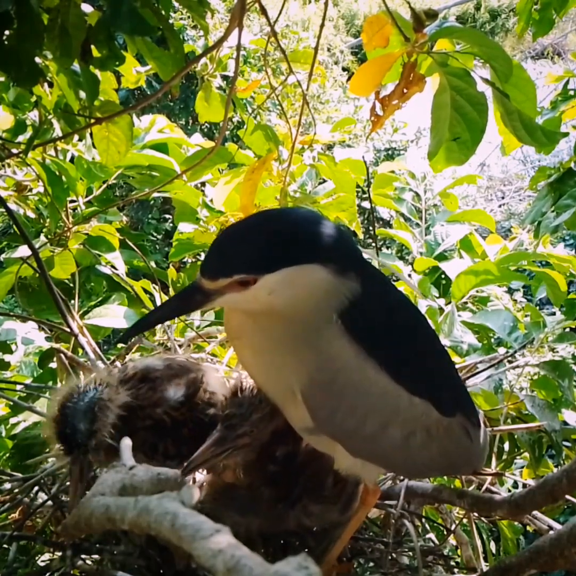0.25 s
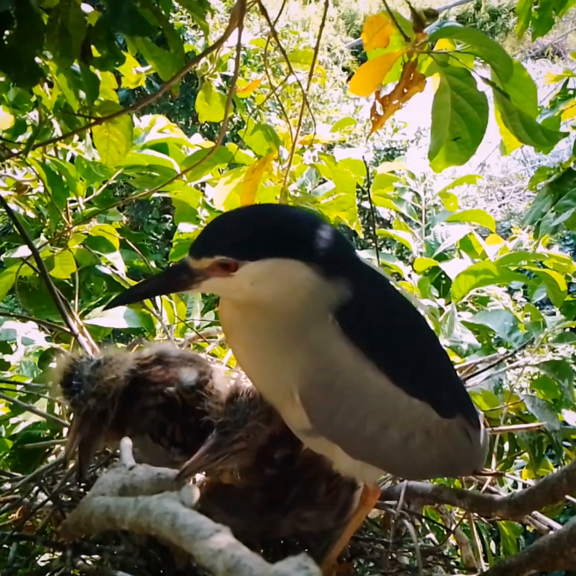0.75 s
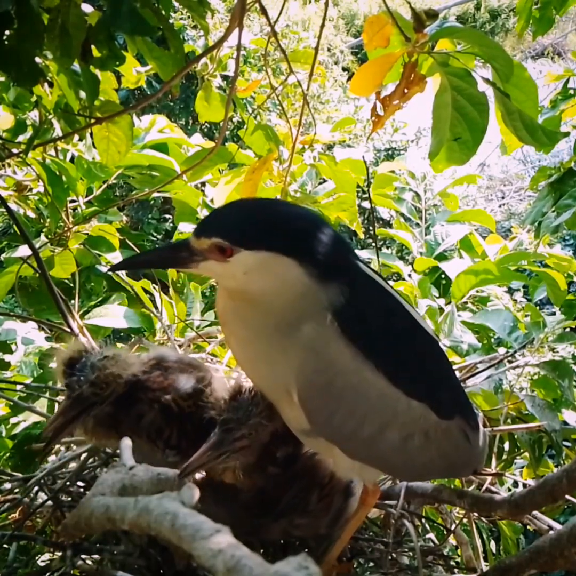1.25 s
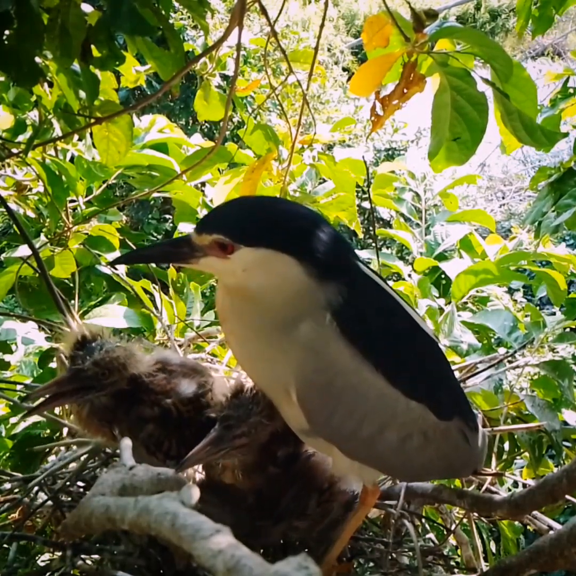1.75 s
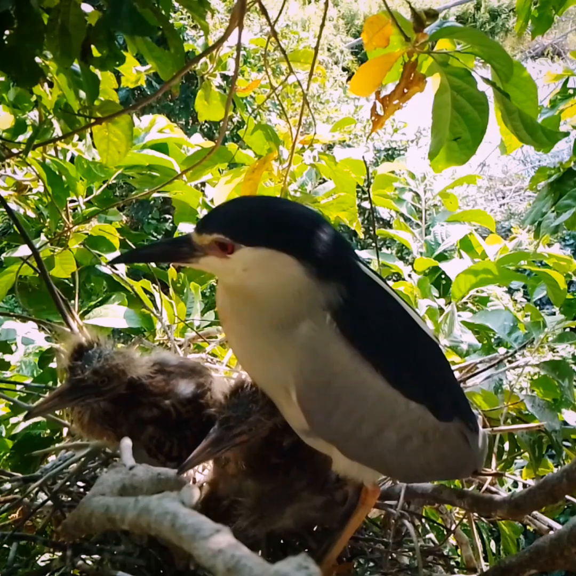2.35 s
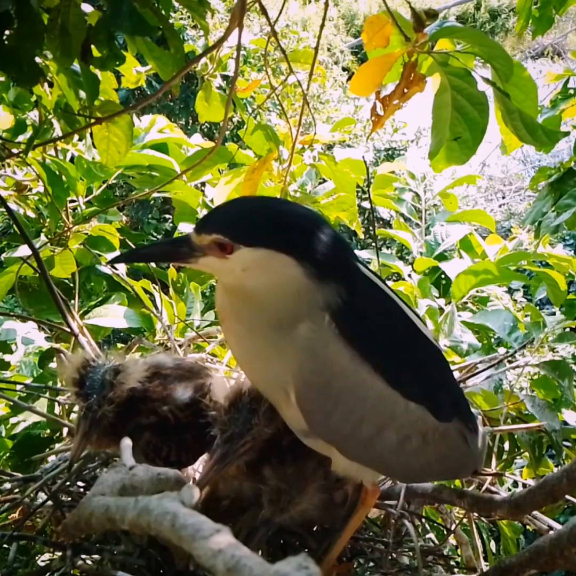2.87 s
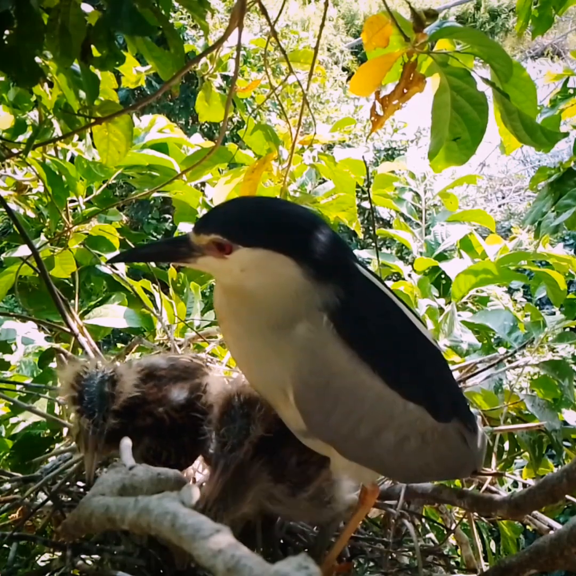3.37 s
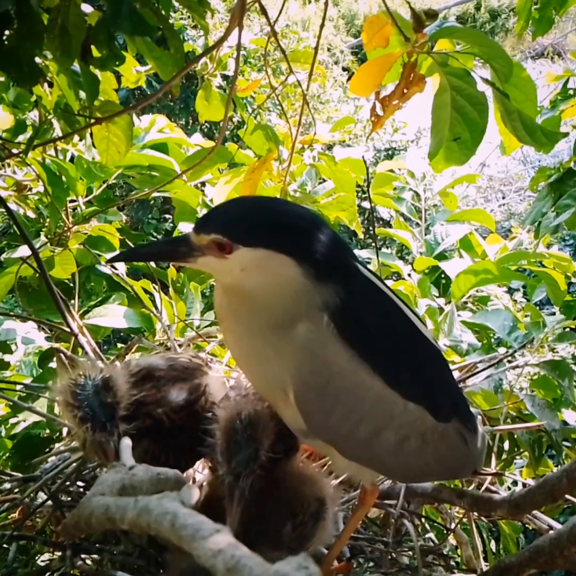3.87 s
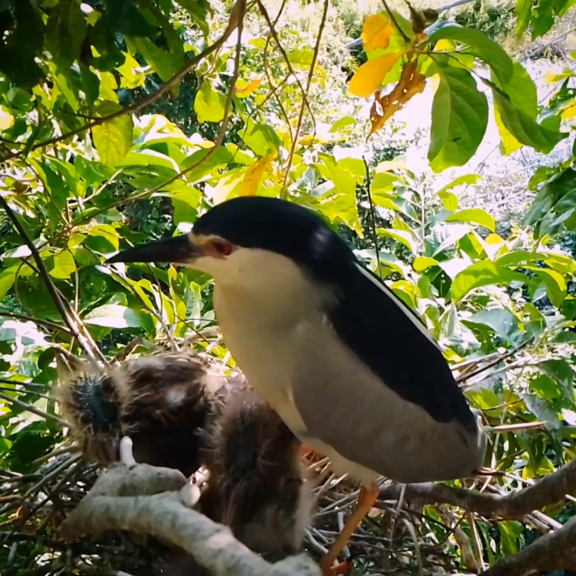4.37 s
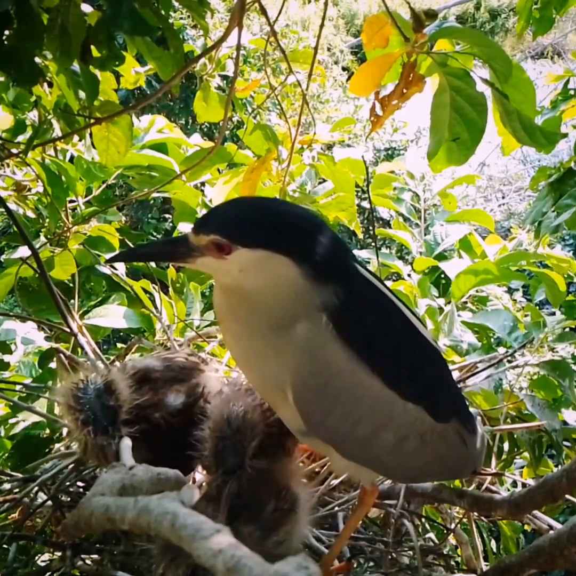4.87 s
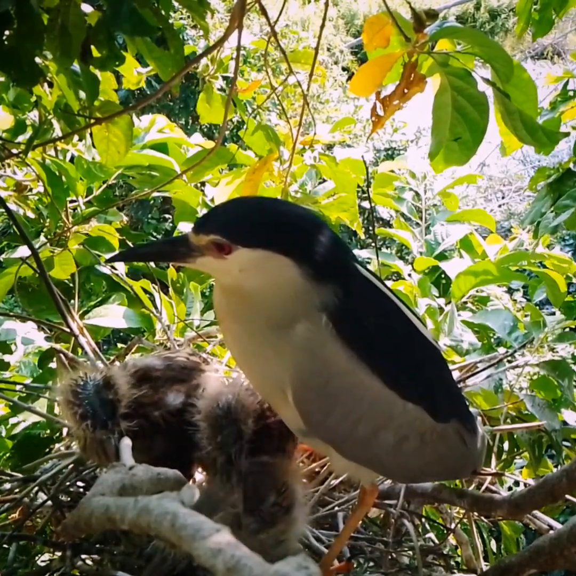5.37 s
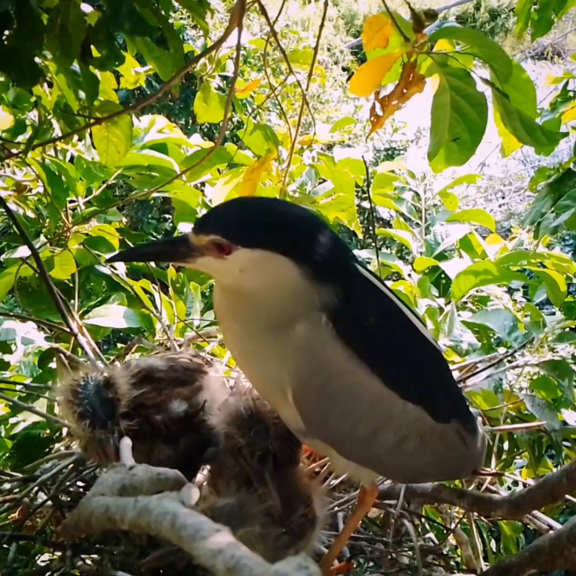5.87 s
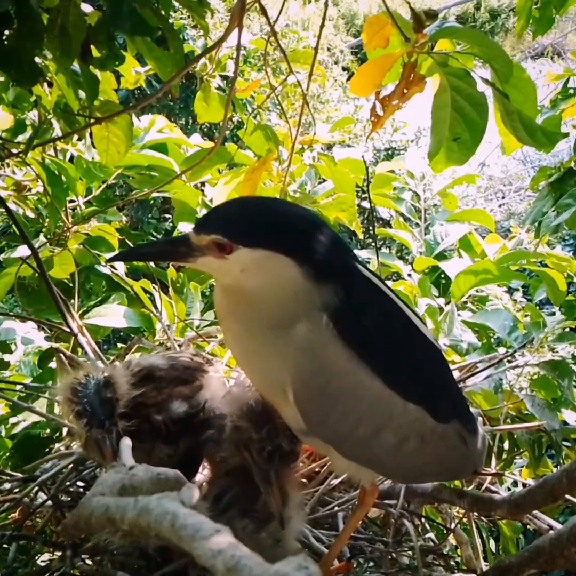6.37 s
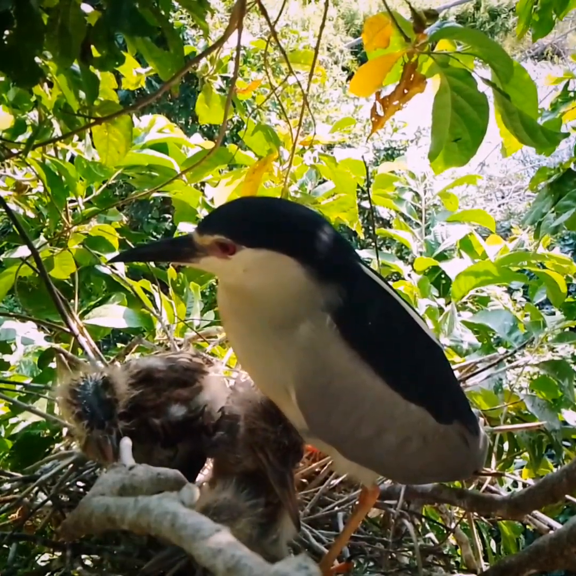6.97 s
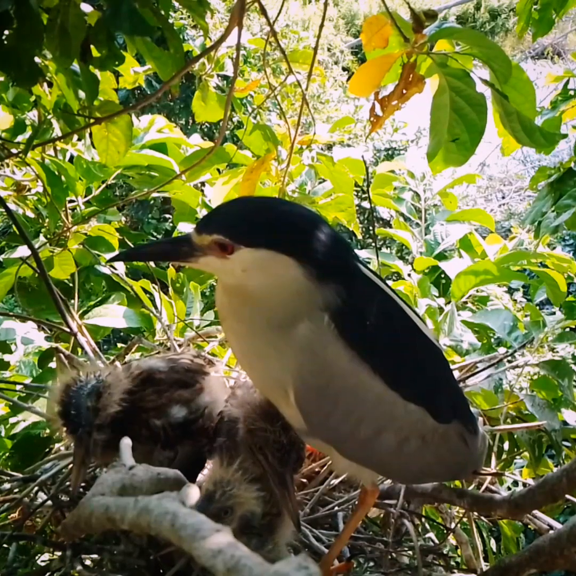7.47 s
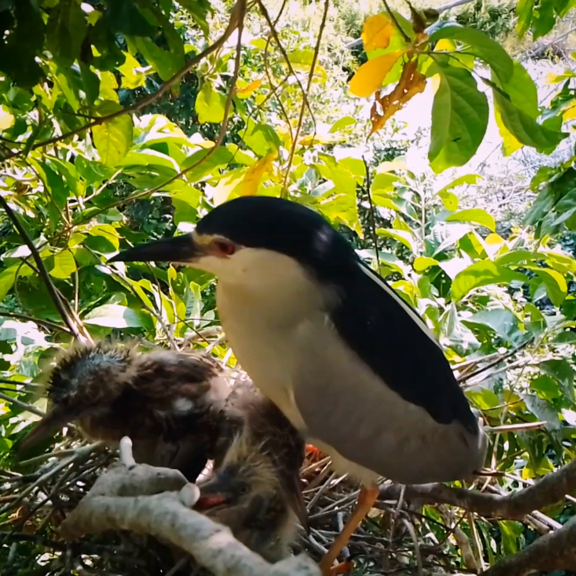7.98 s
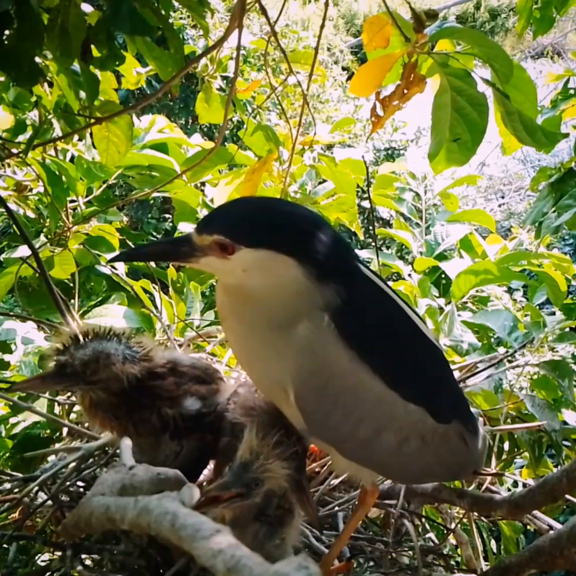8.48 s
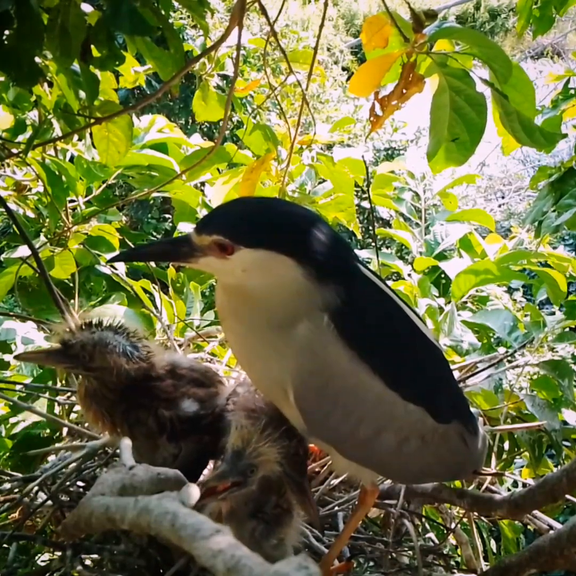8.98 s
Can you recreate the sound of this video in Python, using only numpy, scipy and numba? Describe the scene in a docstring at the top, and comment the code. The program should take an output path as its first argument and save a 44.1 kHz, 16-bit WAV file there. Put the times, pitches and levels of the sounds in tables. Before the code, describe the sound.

Heron chicks beg in a tree nest beside a silent adult. Faint, dry chak notes come several times a second, growing louder; a few thin peeps and a nasal squawk slip in around three seconds. From about five seconds hoarse, hissing rasps crowd between the chaks, strong and urgent to the end. Close stereo microphone, nest slightly to the left, soft leafy air behind.

```python
"""Heron nestlings beg in a nest: short hard "chak" notes (harmonics mixed with breath noise) and hoarse rasps
(throat pulses and noise in a moving mouth resonance, with puffed hiss), plus whistled peeps and harmonic squawks.
A fading noise tail trails the chaks and the hiss, and only faintly the other calls.
A noise tick is a twig; resonant-noise coos and a murmur lie behind.
Two spaced microphone ports, each with its own colour, hear the nest from the left."""
import sys
import numpy as np
from scipy import signal
from scipy.fft import rfft, irfft
from scipy.io import wavfile
from numba import njit

SR = 44100
rng = np.random.default_rng(int(sys.argv[2]) if len(sys.argv) > 2 else 0)


def put_to_file(sound):
    """Save the sound as 16-bit audio at rate SR, in the file named by the first command-line argument."""
    columns = np.atleast_2d(sound).T  # one column per channel
    safe = np.clip(columns, -1, 1)
    whole_steps = np.round(safe * 32767)
    wavfile.write(sys.argv[1], SR, whole_steps.astype(np.int16))


N = 407043
HZ = np.maximum(np.fft.rfftfreq(N, 1 / SR), 1)
RESTING_MOUTH_HZ = 1230


def from_db(db):
    """Decibels to gain."""
    return 10 ** (np.asarray(db) / 20)


def rms_one(x):
    """Scale to rms 1."""
    return x / np.sqrt(np.mean(x ** 2) + 1e-20)


def at_hz(points, hz):
    """Read a spectrum in dB on a log-frequency axis."""
    points_hz, points_db = np.transpose(points)
    return np.interp(np.log(hz), np.log(points_hz), points_db)


def coloured(x, points):
    """Filter a whole-length signal by a spectrum in dB."""
    return irfft(rfft(x) * from_db(at_hz(points, HZ)), N)


def butter(x, order, cutoff_hz, kind):
    """Butterworth filter, "low" or "high" pass."""
    return signal.sosfilt(signal.butter(order, cutoff_hz, kind, fs=SR, output="sos"), x)


def wobble(size, rate_hz):
    """Slow random wander of rms 1: noise through a double one-pole low-pass."""
    r = np.exp(-2 * np.pi * rate_hz / SR)
    noise = rng.standard_normal(size + 2000)
    return rms_one(signal.lfilter([1], [1, -2 * r, r * r], noise)[2000:])


def phase_of(hz):
    """Phase in radians of a moving frequency."""
    return 2 * np.pi * np.cumsum(hz) / SR


def note(start_s, length_s, *pitches_hz):
    """Sample span, place 0-1 and parabolic pitch of one call."""
    along = np.linspace(0, 1, round(length_s * SR))
    at = round(start_s * SR) + np.arange(len(along))
    return at, along, np.polyval(np.polyfit([0, .5, 1], pitches_hz, deg=2), along)


@njit
def moving_resonance(x, hz, width_hz, sr):
    """Two-pole resonance whose centre and width move."""
    out = np.zeros(len(x))
    for i in range(2, len(x)):
        r = np.exp(-np.pi * width_hz[i] / sr)
        drive = (1 - r * r) / 2 * (x[i] - x[i - 2])
        out[i] = drive + 2 * r * np.cos(2 * np.pi * hz[i] / sr) * out[i - 1] - r * r * out[i - 2]
    return out


def breath_pair(points, source=0):
    """Partly alike breath noise for two ports, with narrow bands drifting randomly in pitch and level; rms 1."""
    # narrow noise bands: mean_centre_hz
    band_hz = [2745, 4083, 4940, 5440, 6310, 7570, 10950]
    alike = 0.068  # power share of the noise common to both ports
    shared, *own = rng.standard_normal((3, N))
    air = coloured(np.sqrt(alike) * (shared + source) + np.sqrt(1 - alike) * np.array(own), points)
    out, width_hz = air.copy(), np.full(N, 345.)
    for hz in band_hz:
        centre_hz = hz * (1 + 0.035 * wobble(N, rate_hz=4))
        gain = from_db(3.5 + 3.0 * wobble(N, rate_hz=8))
        out += gain * np.array([moving_resonance(side, centre_hz, width_hz, SR) for side in air])
    return rms_one(out)


def chaks():
    """Harmonics on a pitch that lifts slightly, then slides down, mixed with breath; voice pair and one breath."""
    # notes, levels before trim: start_s, level_db, start_pitch_hz, fade_at_s, throat_hz, treble_lift_db
    chak_notes = [(0.489, -55.5, 666, 0.018, 3400, -8), (0.53, -49, 770, 0.06, 5400, -3.5),
                  (0.736, -47, 793, 0.047, 3830, -9), (0.952, -52.5, 682, 0.013, 2600, -25),
                  (1.037, -41.5, 760, 0.027, 3820, 3.5), (1.1775, -49.5, 820, 0.018, 3950, -26),
                  (1.319, -37.5, 976, 0.028, 3880, -1.5), (1.385, -48, 770, 0.032, 3840, 0),
                  (1.603, -34, 829, 0.031, 3870, 3), (1.713, -48, 730, 0.057, 2540, -6),
                  (1.835, -46, 612, 0.012, 3800, -29), (2.199, -38, 660, 0.018, 2620, -1),
                  (2.278, -53.5, 720, 0.04, 2820, -36), (2.477, -46.5, 950, 0.012, 4100, -11),
                  (2.58, -33.5, 920, 0.032, 2600, -1.5), (2.774, -47.5, 840, 0.012, 4170, -25),
                  (2.892, -33, 1268, 0.028, 2470, -5), (3.397, -45, 956, 0.028, 3280, 10),
                  (3.614, -27, 925, 0.013, 3800, 2), (3.731, -44.5, 930, 0.016, 3700, 7),
                  (3.9595, -33, 1086, 0.02, 2420, -3.5), (4.267, -40, 696, 0.049, 3450, 6.5),
                  (4.496, -36.5, 760, 0.036, 3050, 2), (4.707, -32.5, 843, 0.029, 4000, 2.5),
                  (5.01, -33.5, 714, 0.033, 2920, 3.5), (5.2336, -25.5, 783, 0.026, 3180, -2),
                  (5.368, -40.5, 910, 0.023, 3341, 6.5), (5.432, -27, 820, 0.039, 3700, 0),
                  (6.143, -25.5, 631, 0.016, 3300, 5.5), (6.377, -23, 712, 0.026, 4300, 4.5),
                  (6.599, -23.5, 812, 0.032, 2720, 0.5), (6.823, -26.5, 820, 0.031, 3460, -0.5),
                  (7.049, -25.5, 812, 0.027, 2760, -1), (7.276, -28.5, 796, 0.036, 2730, -7.5),
                  (7.845, -30, 811, 0.029, 3070, 3), (8.083, -30.5, 711, 0.038, 3380, 2),
                  (8.313, -28, 760, 0.035, 3060, -3.5), (8.441, -50.5, 786, 0.036, 5400, 10),
                  (8.525, -26, 809, 0.031, 2900, 5), (8.678, -48, 783, 0.04, 3900, -15),
                  (8.749, -27.5, 803, 0.032, 3040, 4.5), (8.954, -27, 765, 0.028, 3000, -4.5),
                  (9.158, -53, 756, 0.17, 3070, -12)]
    # throat spectrum: frequency_hz, level_db
    throat = [(600, -27), (1800, -28), (2400, -14.5), (3000, -0.5), (4000, -2), (5500, -5), (7500, -9),
              (11000, -8.5), (13500, -26)]
    # notes clear up as the begging gets eager: time_s, roughness (0-1)
    roughness = [(0, .55), (4.2, .42), (5.0, .36), (9.2, .31)]
    attack_s, trim_db, pitch_bend = 0.019, -4, .048
    ring_db, ring_width_hz = 5.5, 350
    size = 4410
    voice, air = np.zeros((2, N)), np.zeros((2, N))
    breath = breath_pair(throat)
    bright = rms_one(butter(breath, 2, 5000, "high"))
    t, k = np.arange(size) / SR, np.arange(1, 19)[:, None]
    for start_s, level_db, pitch_hz, fade_at_s, throat_hz, lift_db in chak_notes:
        at = np.minimum(round(start_s * SR) + np.arange(size), N - 1)
        along = np.minimum(t / fade_at_s, 1)
        # the membranes lose their regular beat along the note
        broken = np.clip(np.interp(start_s, *np.transpose(roughness)) + .45 * (along - .3), .03, 1)
        bend = pitch_bend * rng.uniform(.6, 1.3) * (.9 * along - 2 * along ** 2.5)
        hz = pitch_hz * (1 + bend + 0.027 * broken * wobble(size, rate_hz=200))
        phase = phase_of(hz)

        treble_db = lift_db * np.clip((k * hz - 3500) / 3000, 0, 1) + 2.8 * (k * hz > 3600)
        throat_ring_db = ring_db / (1 + ((k * hz - throat_hz) / ring_width_hz) ** 2)
        uneven_db = rng.normal(0, 2.2, k.shape)
        partials_db = at_hz(throat, k * hz) + treble_db + throat_ring_db + uneven_db
        partials = from_db(partials_db) * np.cos(k * phase + rng.uniform(0, 2 * np.pi, k.shape))
        # each port draws its own random balance of harmonics for every note
        tone = rms_one(from_db(rng.normal(0, 3, (2, len(k)))) @ partials)

        noise = breath[:, at] + from_db(lift_db - 5.0) * bright[:, at]
        puffs = rms_one(noise * (1 + 0.42 * np.cos(phase)))

        flutter_db = 1.6 * wobble(size, rate_hz=120)
        fade_db = -3 * along ** 2 - 930 * np.maximum(t - fade_at_s, 0)
        attack = np.sin(np.pi / 2 * np.minimum(t / attack_s, 1)) ** 1.52
        shape = from_db(level_db + trim_db) * attack * from_db(flutter_db + fade_db)
        voice[:, at] += shape * (np.sqrt(1 - broken ** 2) * tone + broken * puffs)
        air[:, at] += shape * (puffs + .5 * tone)
    return voice, air[0]


def rasp_effort():
    """Croak dB, mouth Hz and hiss dB in time; croak power weights the mouth, so the loudest rasp dominates."""
    # rasps, levels before trim: start_s, swell_s, swell_db, fade_s, croak_db, hiss_db,
    # mouth_start_hz, mouth_peak_hz, mouth_end_hz
    rasp_calls = [(-.03, 0.024, 3.6, 0.091, -97, -48.5, 1120, 1070, 1080),
                  (.01, 0.1, 10, 0.036, -67, -57.5, 1150, 1110, 1050),
                  (.275, 0.022, 4, 0.072, -75, -65.5, 1300, 1300, 1300),
                  (.98, 0.061, 10, 0.11, -63, -61.5, 1060, 1070, 1020),
                  (1.321, 0.009, 4.8, 0.027, -63, -60, 1860, 2080, 1730),
                  (1.537, 0.12, 15, 0.0485, -48, -50, 1520, 1620, 1710),
                  (2.0, 0.015, 2, 0.069, -67.5, -70, 960, 940, 900),
                  (2.05, 0.013, 2, 0.063, -78, -61, 900, 880, 860),
                  (2.2, 0.1, 4.7, 0.063, -61.5, -67, 960, 986, 900),
                  (2.577, 0.033, 3.8, 0.27, -59.5, -50, 2280, 2360, 2350),
                  (2.801, .12, 24, 0.047, -55.5, -55, 844, 1460, 1010),
                  (2.921, 0.053, 2, 0.19, -64.5, -40, 820, 830, 1000),
                  (3.398, 0.12, 5.9, 0.19, -57.5, -48.5, 1570, 1240, 1400),
                  (3.719, 0.065, 13, 0.051, -54.5, -109, 1320, 1320, 1300),
                  (3.972, 0.093, 6.1, 0.39, -65, -55, 1650, 1062, 1140),
                  (4.37, 0.018, 3.6, 0.084, -64, -56, 1030, 970, 980),
                  (4.5, 0.1, 5, 0.16, -96, -58, 960, 1600, 1000),
                  (4.628, 0.08, 4.7, 0.22, -59.5, -66, 1010, 927, 960),
                  (4.735, 0.066, 7.3, 0.091, -49, -39, 1270, 1320, 1240),
                  (5.0, 0.14, 21.8, 0.072, -40.5, -33, 1050, 1390, 1190),
                  (5.36, 0.11, 12.5, 0.11, -41, -32.5, 927, 1430, 1240),
                  (5.598, 0.12, 17, 0.045, -50.5, -56.5, 1400, 1479, 1210),
                  (5.721, 0.13, 15.2, 0.19, -40, -34.5, 877, 1645, 1460),
                  (5.939, 0.028, 7.3, 0.029, -54, -44.5, 1490, 1400, 1440),
                  (6.021, 0.14, 21, 0.4, -45.5, -46.5, 1440, 1405, 1390),
                  (6.181, 0.12, 0.73, 0.12, -44.5, -40, 1430, 1490, 1100),
                  (6.382, 0.025, 8.7, 0.04, -41, -37, 905, 1000, 910),
                  (6.44, 0.11, 15, 0.13, -42.5, -32.5, 1100, 1640, 1740),
                  (6.62, 0.077, 2.5, 0.087, -48, -50, 900, 906, 1340),
                  (6.72, 0.074, 3.8, 0.16, -52.5, -50.5, 1650, 1220, 1150),
                  (6.84, 0.12, 10, 0.1, -43.5, -33, 1420, 1670, 1420),
                  (7.181, 0.13, 14, 0.19, -43.5, -36.5, 1260, 1530, 1500),
                  (7.37, 0.038, 3, 0.91, -67.5, -79, 1600, 1610, 1460),
                  (7.58, 0.1, 21.6, 0.09, -48, -52, 1350, 1380, 1280),
                  (7.699, 0.066, 5.5, 0.13, -59, -58, 950, 940, 900),
                  (7.961, 0.14, 14.4, 0.075, -51.5, -56, 840, 1290, 1420),
                  (8.1, 0.059, 5.7, 0.082, -45.5, -39.5, 1240, 1590, 1510),
                  (8.25, 0.1, 3.7, 0.19, -58.5, -59, 900, 900, 950),
                  (8.443, 0.13, 16.5, 0.14, -47, -45.5, 980, 1400, 1380),
                  (8.85, .09, 8.4, 0.048, -60.5, -46, 960, 1070, 1000),
                  (8.97, 0.06, 7.1, 0.21, -48.5, -50.5, 1050, 1080, 940),
                  (9.13, 0.082, 18, 0.088, -48, -47, 1130, 1600, 1560)]
    onset_s, fade_db, hiss_steeper = 0.01, 22, 1.5  # fade in dB per fade_s; swell factor for the hiss
    resting_croak_db, resting_hiss_db = -90, -72.5  # quiet wheezing between the rasps
    t = np.arange(0, N, 64) / SR
    columns = np.transpose(rasp_calls)[:, :, None]
    start_s, swell_s, swell_db, fade_s, croak_db, hiss_db, start_hz, peak_hz, end_hz = columns
    rising = np.clip(1 - (t - start_s) / swell_s, 0, 1)
    falling = np.maximum(t - start_s - swell_s, 0) / fade_s
    gate = np.clip((t - start_s) / onset_s, 0, 1) * from_db(-fade_db * falling)
    croak = gate * from_db(croak_db - swell_db * rising)
    hiss = gate * from_db(hiss_db - hiss_steeper * swell_db * rising)
    mouth_hz = peak_hz + (start_hz - peak_hz) * rising + (end_hz - peak_hz) * np.minimum(falling, 1)

    power, rest = croak ** 2, from_db(2 * resting_croak_db)
    total = power.sum(0) + rest
    mean_mouth_hz = ((power * mouth_hz).sum(0) + rest * RESTING_MOUTH_HZ) / total
    hiss_power = (hiss ** 2).sum(0) + from_db(2 * resting_hiss_db)
    controls = [10 * np.log10(total), mean_mouth_hz, 10 * np.log10(hiss_power)]
    return [np.interp(np.arange(N) / SR, t, control) for control in controls]


def rasps():
    """Uneven throat pulses and noise ring in a moving mouth resonance; breath hiss comes in puffs with them."""
    # hiss spectrum: frequency_hz, density_db_per_hz
    hiss_spectrum = [(300, -34.5), (1700, -10.5), (2250, -23), (2800, -5.5), (3900, 2), (5000, -3),
                     (7500, -6.5), (9000, -2.5), (11000, -6), (13500, -1.5)]
    # mouth resonance width, narrowest for a soft moan: croak_db, width_hz
    mouth_width = [(-102, 160), (-60.5, 51), (-60.5, 234), (-22, 170)]
    pulse_rate_hz, jitter, noise_share = 598.8, .07, 0.38
    upper_rest_hz, upper_follows, upper_db = 3520, 1.86, -8  # second mouth mode; Hz moved per Hz of the first
    croak_db, mouth_hz, hiss_db = rasp_effort()

    wander = jitter * wobble(N, rate_hz=160) + .06 * wobble(N, rate_hz=5.4)
    cycles = np.cumsum(pulse_rate_hz * (1 + wander)) / SR
    ticks = np.diff(np.floor(cycles), prepend=0)
    pulses = rms_one(ticks * from_db(3.5 * wobble(N, rate_hz=410)))
    source = pulses + noise_share * rng.standard_normal(N)

    def ring_twice(x, hz, first_width_hz, second_width_hz):
        """Two moving resonances in series."""
        return moving_resonance(moving_resonance(x, hz, first_width_hz, SR), hz, second_width_hz, SR)

    width_hz = np.interp(croak_db, *np.transpose(mouth_width))
    sides = source + .55 * rng.standard_normal((2, N))  # each port hears some air of its own
    mouth = np.array([ring_twice(side, mouth_hz, width_hz, 3 * width_hz) for side in sides])
    mouth = mouth / np.sqrt(width_hz)
    chest = moving_resonance(source, np.full(N, 560.), np.full(N, 250.), SR)

    # broad, damped part of the mouth's ring: noisier, and different at each port
    skirt_width_hz, skirt_air = np.full(N, 750.), 2.5 * rng.standard_normal((2, N))
    skirt = np.array([moving_resonance(pulses + air, mouth_hz, skirt_width_hz, SR) for air in skirt_air])

    upper_hz = upper_rest_hz + upper_follows * (mouth_hz - RESTING_MOUTH_HZ)
    upper_width_hz, upper_air = np.full(N, 550.), 2 * rng.standard_normal((2, N))
    upper = np.array([ring_twice(pulses + air, upper_hz, upper_width_hz, upper_width_hz) for air in upper_air])

    croak = rms_one(mouth) + from_db(-23.5) * rms_one(chest)
    croak = croak + from_db(upper_db) * rms_one(upper) + from_db(-12.5) * rms_one(skirt)
    breath = breath_pair(hiss_spectrum, source=0.9 * pulses)
    puffs = breath * (1 + .7 * np.cos(2 * np.pi * cycles)) * from_db(1.7 * wobble(N, rate_hz=130))
    return from_db(croak_db - 2.0) * croak, from_db(hiss_db + 0.5) * rms_one(puffs)


def peeps():
    """Whistled notes of three harmonics, some clean, some rattled by a second, unsteady vibration."""
    # thin peeps, levels before trim: start_s, length_s, start_pitch_hz, mid_pitch_hz, end_pitch_hz,
    # fundamental_db, second_harmonic_db, third_harmonic_db, swell_db, rattle (0-1)
    peep_notes = [(0.553, 0.057, 2344, 2385, 2160, -63, -34.5, -63, 7.5, 0.22),
                  (2.926, 0.048, 2555, 2520, 2680, -42.5, -61, -35, 8, 0.32),
                  (3.444, 0.053, 3430, 3240, 3184, -33.5, -36.5, -53, 32, 0.16),
                  (3.496, 0.0606, 3090, 2850, 2520, -37, -42, -38.5, -1.5, 0.99),
                  (3.991, 0.087, 2650, 2680, 2790, -46, -38, -47.5, 1.5, 1),
                  (4.055, 0.044, 2775, 2670, 2540, -44, -46, -53.5, 2.5, 0.38),
                  (4.294, 0.055, 2870, 2840, 2940, -52, -64, -87, 16, 0.15),
                  (5.065, 0.043, 2580, 2570, 3000, -52.5, -65, -77, 0, 0.029),
                  (5.1, 0.06, 2820, 2650, 2460, -47, -51, -51, -4.5, 0.47),
                  (5.904, 0.08, 2505, 2720, 2434, -45.5, -61, -51.5, -1, 0.3)]
    rattle_hz, trim_db = 371.4, 4.0
    out = np.zeros(N)
    for start_s, length_s, start_hz, mid_hz, end_hz, *levels_db, swell_db, rattle in peep_notes:
        at, along, hz = note(start_s, length_s, start_hz, mid_hz, end_hz)
        size = len(at)
        window = signal.windows.tukey(size, .2) * from_db(swell_db * (along - 1))
        phase = phase_of(hz * (1 + (.01 + .035 * rattle ** 2) * wobble(size, rate_hz=250)))
        beat = phase_of(rattle_hz * (1 + 0.21 * wobble(size, rate_hz=180)))
        chopped = (1 - 0.73 * rattle) + 0.33 * rattle * np.cos(beat)
        whistle = sum(from_db(db + trim_db) * np.sin(k * phase) for k, db in enumerate(levels_db, 1))
        out[at] += window * chopped * whistle
    return out


def squawks():
    """Harmonic stacks: the fundamental, harmonics boosted near the throat resonance, bright air puffed each cycle."""
    # clear squawks, levels before trim: start_s, length_s, start_pitch_hz, mid_pitch_hz, end_pitch_hz,
    # fundamental_db, strongest_harmonic (number), strongest_db
    squawk_notes = [(1.558, 0.1205, 507.5, 566.6, 547, -72.5, 3.0, -51.5),
                    (2.12, 0.059, 697, 750, 380, -82, 2.5, -70),
                    (2.97, 0.11, 766, 819, 731, -58.5, 4.0, -35),
                    (3.399, 0.061, 543, 489, 410, -75.5, 3.06, -59.5),
                    (3.49, 0.054, 670, 524, 388, -91, 2.0, -60),
                    (3.74, 0.075, 345, 352, 332, -84, 3.3, -68),
                    (5.955, .045, 1123, 953, 600, -66.5, 2.8, -65),
                    (7.007, 0.022, 797, 747, 600, -65.5, 3.47, -46),
                    (8.285, 0.041, 616, 577, 550, -71, 2.0, -57)]
    air_db, top_hz, top_db = -5, 7140, -11  # air and a high ring, relative to strongest_db
    out, k = np.zeros((2, N)), np.arange(2, 12)[:, None]
    air = rms_one(butter(rng.standard_normal((2, N)), 6, 5800, "high"))
    for start_s, length_s, start_hz, mid_hz, end_hz, low_db, strongest, peak_db in squawk_notes:
        at, along, hz = note(start_s, length_s, start_hz, mid_hz, end_hz)
        size, peak_hz = len(at), strongest * hz
        window = signal.windows.tukey(size, .25) * from_db(-5.0 * (2 * along - 1) ** 2)
        phase = phase_of(hz * (1 + .017 * wobble(size, rate_hz=150)))

        throat = from_db(peak_db + 4) / (1 + ((k * hz - peak_hz) / 160) ** 2)
        skirt = from_db(peak_db - 10) * np.minimum(peak_hz / (k * hz), k * hz / peak_hz) ** 4
        top = from_db(peak_db + top_db) / (1 + ((k * hz - top_hz) / 700) ** 4)
        harmonics = np.sum((throat + skirt + top) * np.sin(k * phase), axis=0)
        fundamental = from_db(low_db + 5.5) * np.sin(phase)

        flutter = from_db(2.2 * wobble(size, rate_hz=90))
        hiss = from_db(peak_db + air_db) * air[:, at] * (1 + .7 * np.cos(phase))
        out[:, at] += window * flutter * (fundamental + harmonics + hiss)
    return out


def twig():
    """One dry, very bright tick: decaying noise, high-passed."""
    start_s, level_db, t60_s = 3.343, -36.0, .012  # level ahead of the high-pass
    out, t = np.zeros(N), np.arange(600) / SR
    tick = from_db(level_db - 60 * t / t60_s) * rng.standard_normal(600)
    out[round(start_s * SR) + np.arange(600)] = butter(tick, 3, 8000, "high")
    return out


def breath_tail(x):
    """Fading noise tail: convolution with a dying burst of noise, another for each side."""
    t60_s, rise_s = 0.24, 0.0045
    t = np.arange(SR // 2) / SR
    tails = rng.standard_normal((2, len(t))) * from_db(-60 * t / t60_s) * np.minimum(t / rise_s, 1)
    return signal.fftconvolve(x[None], tails / np.linalg.norm(tails[0]), axes=1)[:, :N]


def coos():
    """Breathy hums: noise through a narrow resonance, applied twice."""
    # faint low coos from a far bird: start_s, length_s, start_pitch_hz, mid_pitch_hz, end_pitch_hz, level_db
    coo_notes = [(1.2, 0.33, 605, 567, 566, -83.5), (1.66, 0.19, 580, 588, 570, -77),
                 (7.5, 0.54, 565, 610, 590, -80), (7.78, 0.34, 840, 830, 816, -71.5)]
    out = np.zeros(N)
    for start_s, length_s, start_hz, mid_hz, end_hz, level_db in coo_notes:
        at, along, hz = note(start_s, length_s, start_hz, mid_hz, end_hz)
        width_hz = np.full(len(at), 120.)
        hum = moving_resonance(rng.standard_normal(len(at)), hz, width_hz, SR)
        hum = moving_resonance(hum, hz, width_hz, SR)
        out[at] += from_db(level_db) * np.sin(np.pi * along) ** .5 * rms_one(hum)
    return out


def murmur():
    """Faint far noise, alike on both sides only in the bass."""
    # murmur spectrum: frequency_hz, density_db_per_hz
    murmur_spectrum = [(20, 5), (40, -16.5), (100, -12), (140, -29.5), (200, -12.5), (630, -7), (1560, -15),
                       (2640, -0.5), (6330, -15.5), (7610, -6.5), (11300, -16), (14000, -6.5)]
    level_db = -70.5
    shared, *own = coloured(rng.standard_normal((3, N)), murmur_spectrum)
    # below 700 Hz most of each side's own noise is swapped for the shared one
    bass = butter(shared - np.array(own), 1, 700, "low")
    return from_db(level_db + 2.5 * wobble(N, rate_hz=6)) * rms_one(own + .8 * bass)


def scene():
    """The nest's sound reaches the right port a little later; a tail trails chaks and hiss, faintly the rest."""
    right_lag_s = 0.0003586
    chak_tail_db, call_tail_db, hiss_tail_db = -6, -22.0, -4.5
    chak, chak_air = chaks()
    croak, hiss = rasps()
    calls = croak + peeps() + squawks() + coos() + twig()
    left, right = chak + calls + hiss
    late_right = irfft(rfft(right) * np.exp(-2j * np.pi * HZ * right_lag_s), N)
    tail_source = from_db(chak_tail_db) * chak_air + from_db(call_tail_db) * calls[0]
    tail_source = tail_source + from_db(hiss_tail_db) * hiss[0]
    nest = np.array([left, late_right]) + breath_tail(tail_source)
    return butter(nest, 4, 300, "high") + murmur()


def record(dry):
    """Each port has its own colour; a steep low-pass cuts the top."""
    # port responses: frequency_hz, gain_db
    left_port = [(200, 8.5), (2000, 8), (5000, -2), (7600, 11.5), (8600, 2), (9600, -6.5), (11500, -23.5),
                 (14000, -13)]
    right_port = [(200, 9), (2000, 7.5), (5000, -4), (7000, -3), (8500, -6.5), (11000, 5), (11800, 2.5),
                  (12600, -19), (14000, -32)]
    stop_hz, stop_db = 14900, 70
    ports = [coloured(dry[0], left_port), coloured(dry[1], right_port)]
    return signal.sosfilt(signal.cheby2(12, stop_db, stop_hz, fs=SR, output="sos"), ports)


dry = scene()
out = record(dry)
put_to_file(out)
```